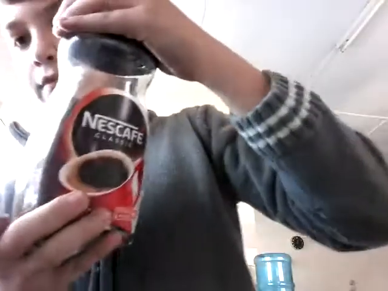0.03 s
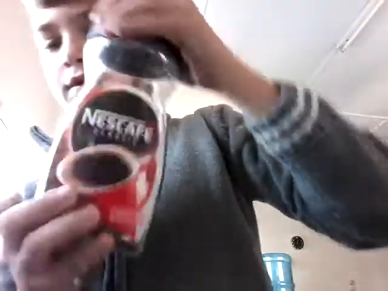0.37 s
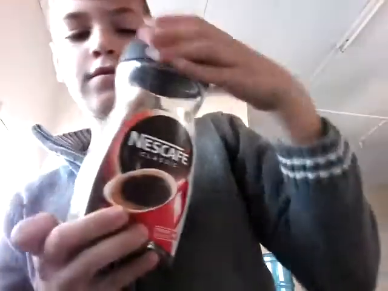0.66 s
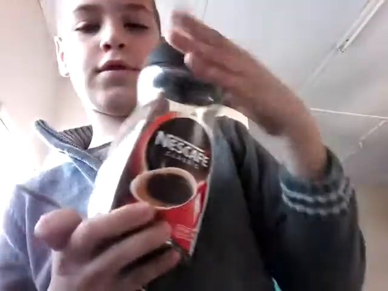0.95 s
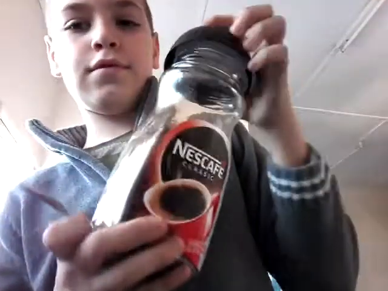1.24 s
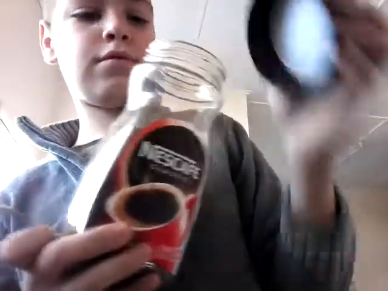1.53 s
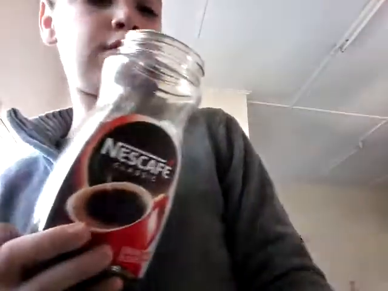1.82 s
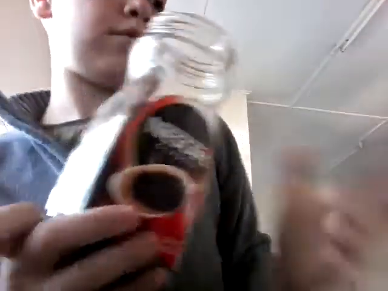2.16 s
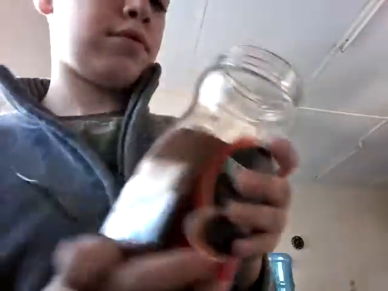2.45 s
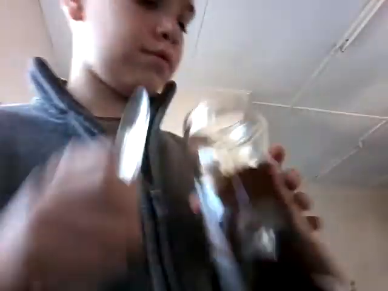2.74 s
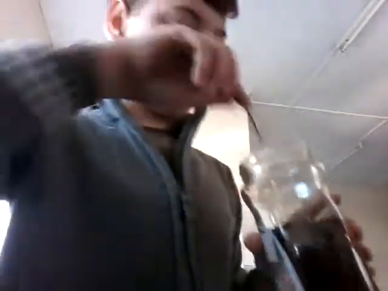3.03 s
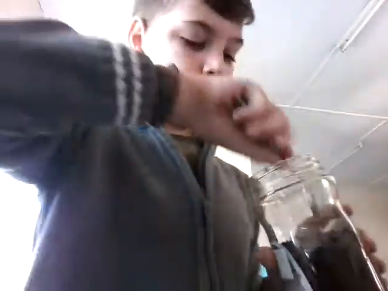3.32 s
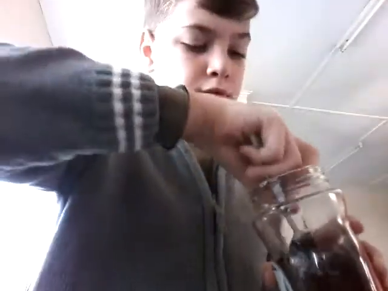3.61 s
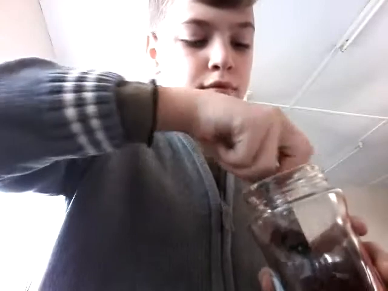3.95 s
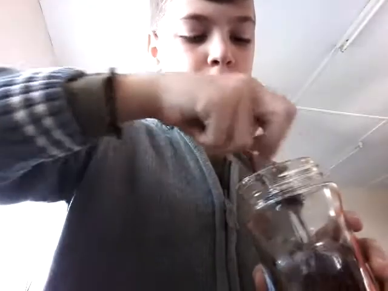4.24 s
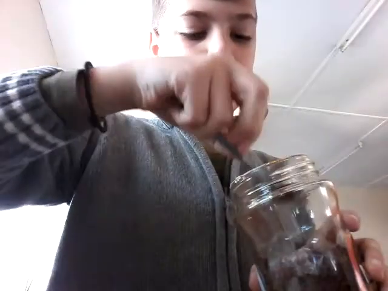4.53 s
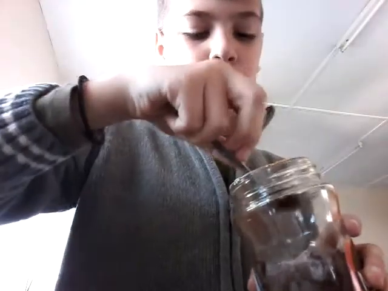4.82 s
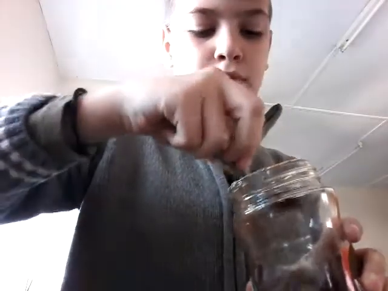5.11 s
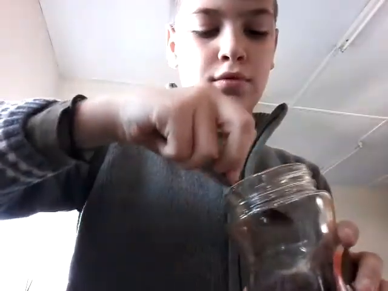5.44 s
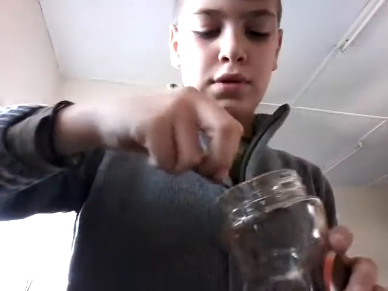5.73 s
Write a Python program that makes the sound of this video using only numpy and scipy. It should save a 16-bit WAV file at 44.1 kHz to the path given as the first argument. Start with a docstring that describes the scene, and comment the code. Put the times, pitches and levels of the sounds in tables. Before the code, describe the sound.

Close to the microphone in a kitchen, a plastic lid rubs and clicks along the thread of a glass coffee jar, then snaps free. It is put down on a table with a loud, hollow clack. After a pause, a metal teaspoon clinks brightly against the glass, taps it again more softly and ticks lightly as it digs. A faint hum and hiss run underneath.

```python
"""Opening a coffee jar

In a humming kitchen, close to the microphone, the plastic lid of a glass jar rubs along its thread,
snaps free and is put down on the table, where its cup rings. A teaspoon goes into the jar, clinks
against the glass, taps it again and ticks lightly as it digs in the coffee. Each blow excites damped
modes; the hand damps the jar, so most of the ring that follows is the reverberation of the room."""
import sys
import numpy as np
from scipy import signal
from scipy.fft import rfft, irfft, next_fast_len
from scipy.io import wavfile

SR = 44100
rng = np.random.default_rng(int(sys.argv[2]) if len(sys.argv) > 2 else 0)


def store_pcm(level_fs):
    """Save levels as 16-bit WAV."""
    pcm = np.round(np.clip(level_fs, -1, 1) * 32767).astype(np.int16)
    wavfile.write(sys.argv[1], SR, np.atleast_2d(pcm).T)


N = 258887
TIME = np.arange(N) / SR  # seconds into the scene
T = np.arange(SR // 2) / SR  # seconds since a blow

# Slow swings of the background. Each row: time in seconds, level in dB.
BACKGROUND_LEVEL = [(0.0, -52.5), (0.1, -54), (1.32, -52), (1.77, -54), (2.01, -50.5), (2.35, -55.5),
                    (3.81, -52), (4.23, -53.5), (5.13, -56), (5.33, -55), (5.87, -54.5)]
# Modes of the jar wall. Each row: frequency in Hz, relative level in dB, T60 in seconds.
GLASS_MODES = [(3780, -6.5, 0.054), (4088, -3, 0.086), (7100, -2.5, 0.048), (9200, -9, 0.089),
               (12100, -27, .05)]
# Spectrum of steel scratching glass. Each row: frequency in Hz, relative level in dB.
SCRATCH_SPECTRUM = [(1200, -57), (2000, -2), (2600, -8.5), (3400, -10.5), (4300, 0), (5500, 4.5),
                    (6200, 3.5), (7200, 6), (9500, -15), (16000, -15)]


def amp(db):
    """Amplitude ratio for a level in decibels."""
    return 10 ** (np.asarray(db) / 20)


def unit(x):
    """Normalisation to an rms of 1."""
    return x / np.sqrt(np.mean(x ** 2) + 1e-20)


def along(points, hz):
    """Interpolation of (Hz, value) points on a logarithmic frequency axis."""
    freqs, values = np.transpose(points)
    return np.interp(np.log(hz + 1), np.log(freqs), values)


def filtered(x, response):
    """Linear filtering: the spectrum of x is multiplied by a frequency response."""
    size = x.shape[-1]
    padded = next_fast_len(size + 4096)
    return irfft(rfft(x, padded) * response(np.fft.rfftfreq(padded, 1 / SR)), padded)[..., :size]


def noise(spectrum):
    """Spectral shaping of white noise, at rms 1."""
    return unit(filtered(rng.standard_normal(N), lambda hz: amp(along(spectrum, hz))))


def band(hz, width_hz):
    """Band-pass noise of rms 1: a narrow band beats like a wavering tone, a broad one hisses."""
    return unit(filtered(rng.standard_normal(N), lambda f: 1 / (1 + ((f - hz) / width_hz * 2) ** 2)))


def causal(x, spectrum):
    """Minimum-phase filtering: a body answers only after it is struck."""
    size = len(x)
    gain = amp(along(spectrum, np.fft.rfftfreq(size, 1 / SR)))
    cepstrum = irfft(np.log(gain), size)
    cepstrum[1:size // 2] *= 2
    cepstrum[size // 2:] = 0
    return irfft(rfft(x) * np.exp(rfft(cepstrum)), size)


def burst(spectrum, t60):
    """A contact transient: noise that falls 60 dB in t60 seconds, with the energy of its envelope."""
    fade = amp(-60 * T / t60)
    crack = causal(rng.choice([-1, 1], len(T)) * fade, spectrum)
    return unit(crack) * np.sqrt(np.mean(fade ** 2))


def ring(modes, attack_s, free=1, tilt_db=0):
    """Sum of damped modes: a grip scales T60 by free; hard contact tilts them up (dB per octave)."""
    hz, db, t60 = np.transpose(modes)[:, :, None]
    sign = (-1) ** np.arange(len(modes))[:, None]  # neighbouring modes start in opposite directions
    fade = amp(db + tilt_db * np.log2(hz / hz[0]) - 60 * T / (t60 * free))
    return (sign * fade * np.sin(2 * np.pi * hz * T)).sum(0) * (1 - np.exp(-T / attack_s))


def swell(s, rise_s, fall_s):
    """An exponential envelope that climbs 20 dB in rise_s to 1 at time s and drops 20 dB in fall_s."""
    since = TIME - s
    return amp(-20 * np.maximum(-since / rise_s, since / fall_s))


def in_room(x, wet_db, build_s=0.0013, dull_hz=10000):
    """Reverberation: reflections from the walls build a diffuse tail that has lost its top."""
    # Decay of the kitchen. Each row: frequency in Hz, T60 in seconds.
    reverb_times = [(200, 0.61), (1000, 0.54), (2200, 0.44), (4600, 0.38), (6700, 0.34), (8500, 0.28),
                    (14000, 0.39)]
    hz, t, bins = signal.stft(rng.standard_normal(len(T)), SR, nperseg=256)
    fade = amp(-60 * t / along(reverb_times, hz)[:, None])
    dull = 1 / np.sqrt(1 + (hz[:, None] / dull_hz) ** 6)
    tail = signal.istft(bins * fade * dull, SR, nperseg=256)[1][:len(T)]
    tail *= 1 - np.exp(-T / build_s)
    wet = signal.fftconvolve(x, tail)[:len(x)]
    return x + amp(wet_db) * unit(wet) * np.sqrt(np.mean(x ** 2))


def add(track, s, sound):
    """Superposition of a sound on the track, starting at s seconds."""
    part = track[round(s * SR):][:len(sound)]
    part += sound[:len(part)]


def hum_and_hiss_bands():
    """Band-pass noise: low wavering hum tones, with two broader bands of faint hiss above."""
    # Each row: centre frequency in Hz, bandwidth in Hz, level in dB.
    noise_bands = [(212.4, 10, -72), (324, 7.5, -64), (457.8, 28.3, -59), (998, 13, -75), (1590, 120, -69),
                   (3980, 750, -67)]
    return sum(amp(db) * band(hz, width_hz) for hz, width_hz, db in noise_bands)


def drone(mains_hz=100.6):
    """Low broadband noise and mains hum share one slow amplitude modulation."""
    # Each row: frequency in Hz, relative level in dB.
    drone_spectrum = [(20, -12), (50, -3.5), (80, -2.5), (150, -3), (300, -0.5), (400, 0), (490, 0),
                      (590, -15), (1200, -35)]
    level_db = np.interp(TIME, *np.transpose(BACKGROUND_LEVEL))
    rumble = amp(-1.5) * noise(drone_spectrum)
    mains = amp(-8.5) * band(mains_hz, width_hz=13.4)
    return amp(level_db) * (rumble + mains)


def microphone_hiss(mean_db=-52.5, swing_share=0.78):
    """Broadband noise of the microphone, modulated by a share of the drone's swings in level."""
    # Each row: frequency in Hz, relative level in dB.
    hiss_spectrum = [(200, -27), (700, -7), (1300, -8), (2200, -8.5), (3200, -10.5), (5200, -11),
                     (5800, -6), (6400, -0.5), (7200, 0), (8300, -9.5), (9300, -13.5), (11000, -24),
                     (15500, -32.5)]
    level_db = np.interp(TIME, *np.transpose(BACKGROUND_LEVEL))
    return amp(mean_db + swing_share * (level_db - level_db.mean())) * noise(hiss_spectrum)


def lid_clicks():
    """Impulsive excitation: plastic jumps the thread with a snap, a hollow knock and a soft thud."""
    # Clicks of the lid and of fingers on the jar. Each row: start in seconds, levels of snap,
    # hollow lid and thud in dB, tilt of the snap in dB per octave (a sharp snap is brighter).
    clicks = [(.1063, -43, -54, -47, -4), (0.2825, -25.5, -44, -54, 2), (.3145, -27, -31, -48, -4),
              (.3497, -28, -30.5, -62, -6), (0.6141, -31.5, -35.5, -40.5, -11),
              (.769, -43, -48, -37.5, -11), (1.153, -15, -52, -35, 8.5), (1.1657, -14.5, -39, -38, 3.5),
              (1.2288, -32, -47, -62, -7), (1.3048, -35.5, -45.5, -46, -7), (2.3544, -43, -49, -55, 0)]
    # Spectra of the plastic, the hollow lid and the hands.
    # Each row: frequency in Hz, relative level in dB.
    snap_spectrum = [(1500, -39), (3000, -32), (3900, -5.5), (5500, -0.5), (7200, 5), (8800, 2),
                     (10500, -12), (12000, -21), (16000, -21)]
    hollow_spectrum = [(400, -45), (900, 3), (1400, -12), (2000, 0.5), (2800, -6.5), (4200, 3.5),
                       (6000, -0.5), (10000, -41)]
    thud_spectrum = [(100, -28), (250, 6.5), (450, 8.5), (900, -24), (3000, -47)]
    out = np.zeros(N)
    for s, snap_db, hollow_db, thud_db, tilt_db in clicks:
        tilted = [(hz, db + tilt_db * np.log2(hz)) for hz, db in snap_spectrum]
        snap = amp(snap_db) * burst(tilted, t60=0.018)
        hollow = amp(hollow_db) * burst(hollow_spectrum, t60=0.029)
        thud = amp(thud_db) * burst(thud_spectrum, t60=0.052)
        add(out, s, in_room(snap + hollow + thud, wet_db=-11.5))
    return out


def lid_twist(slips_per_s=2500):
    """Stick-slip friction: plastic rubs in uneven little slips, which also ring the gripped glass."""
    # Pushes along the thread. Each row: time of greatest speed in seconds, run-out in seconds,
    # rub level in dB, glass level in dB.
    pushes = [(.324, 0.026, -38.5, -60), (.347, 0.022, -38, -50), (.376, 0.033, -39.5, -39.5),
              (.435, .14, -50, -66), (.77, .06, -47.5, -50), (1.16, 0.039, -35, -39)]
    # Sliding plastic. Each row: frequency in Hz, relative level in dB.
    rub_spectrum = [(300, -14), (1000, -5.5), (2000, -3.5), (3200, -12), (4000, 0), (5000, -6.5), (7200, 6),
                    (9000, -9), (14000, -26)]
    rub_gain = glass_gain = 0
    for s, run_out_s, rub_db, glass_db in pushes:
        speed = swell(s, rise_s=0.91 * run_out_s, fall_s=run_out_s)
        rub_gain += amp(rub_db) * speed
        glass_gain += amp(glass_db) * speed
    slips = (rng.random(N) < slips_per_s / SR) * rng.standard_normal(N)
    rub = unit(filtered(slips, lambda hz: amp(along(rub_spectrum, hz))))
    jar_response = ring(GLASS_MODES, attack_s=0.00027, free=0.25, tilt_db=-19)
    glass = unit(signal.fftconvolve(slips, jar_response)[:N])
    return in_room(rub_gain * rub + glass_gain * glass, wet_db=-10.5)


def low_tones(fade_s=0.14):
    """Faint low tones come and go: narrow-band noise under a trapezoidal envelope."""
    # Each row: start in seconds, end in seconds, frequency in Hz, level in dB.
    tones = [(.92, 1.85, 250.4, -58), (3.5, 4.048, 210, -61), (5.3, 5.75, 209, -61)]
    out = np.zeros(N)
    for start, end, hz, db in tones:
        gate = np.interp(TIME, [start, start + fade_s, end - fade_s, end], [0, 1, 1, 0])
        out += amp(db) * gate * band(hz, width_hz=4.8)
    return out


def lid_landing():
    """Impact excites the modes of lid and table: the rim hits first, then the lid drops flat."""
    # Each row: start in seconds, gains of lid ring, crack and table thud in dB.
    landings = [(1.8782, 0.5, -11.5, -40), (1.9349, -34, -47, -30)]
    # Modes of the lid's cup and the table top.
    # Each row: frequency in Hz, relative level in dB, T60 in seconds.
    lid_modes = [(738, -22, 0.071), (890, -35, 0.071), (982, -23, 0.065), (1123, -18, 0.086),
                 (1182, -11, 0.046), (1440, -31, 0.055), (1877, -23, 0.047), (2040, -25, 0.023),
                 (2920, -10.5, 0.01), (3440, -20, 0.018), (3750, -21, 0.01), (6500, -33, 0.012),
                 (7200, -30, 0.011)]
    table_modes = [(293, -7.5, 0.16), (463, -6.5, 0.08), (530, 1, 0.024), (790, 10, 0.0065),
                   (1090, 16, 0.015)]
    # Plastic meeting the table. Each row: frequency in Hz, relative level in dB.
    crack_spectrum = [(200, -20), (750, -2.5), (1500, -4.5), (2000, -0.5), (2400, -9), (3000, 0),
                      (3900, -3.5), (4900, -8), (5800, -16), (7000, 2), (8500, -22), (15000, -54)]
    out = np.zeros(N)
    for s, ring_db, crack_db, thud_db in landings:
        cup = amp(ring_db) * ring(lid_modes, attack_s=0.0013)
        table = amp(thud_db) * ring(table_modes, attack_s=0.0012)
        add(out, s, in_room(cup + table, wet_db=-9))
        crack = amp(crack_db) * burst(crack_spectrum, t60=0.014)
        add(out, s, in_room(crack, wet_db=-10))
    return out


def falling_note(start_hz=760, end_hz=440, glide_s=0.0253):
    """An exponential glide: as the lid comes to rest, a faint note sinks to a steady pitch."""
    # Brief swells of the note. Each row: time of the peak in seconds, level in dB.
    swells = [(2.04, -42.5), (2.066, -49), (2.125, -42.5)]
    since = np.maximum(TIME - swells[0][0], 0)
    pitch_hz = end_hz + (start_hz - end_hz) * np.exp(-since / glide_s)
    gain = sum(amp(db) * swell(s, rise_s=0.015, fall_s=0.025) for s, db in swells)
    return gain * np.sin(2 * np.pi * np.cumsum(pitch_hz) / SR)


def spoon_ticks():
    """Light touches of the digging spoon scratch the jar and set its wall in free vibration."""
    # Each row: start in seconds, ring gain in dB, scratch level in dB, ring tilt in dB per octave.
    ticks = [(3.479, -53.5, -56, 11.5), (3.556, -50.5, -60, 8), (4.5132, -51, -60, -6),
             (4.817, -42.5, -49, 2.5), (5.5097, -45, -42, 0), (5.677, -40, -36.5, -6)]
    out = np.zeros(N)
    for s, ring_db, scratch_db, tilt_db in ticks:
        glass = amp(ring_db) * ring(GLASS_MODES, attack_s=0.00093, tilt_db=tilt_db)
        scratch = amp(scratch_db) * burst(SCRATCH_SPECTRUM, t60=0.014)
        add(out, s, in_room(glass + scratch, wet_db=-17))
    return out


def spoon_clinks():
    """The spoon strikes the jar and rings in its own modes; coffee cushions the blow as a low-pass."""
    # Each row: start in seconds, ring gain in dB, scratch gain in dB, share of the free ring time
    # from 0 to 1, contact cut-off in Hz, reverberation relative to the ring in dB.
    clinks = [(3.7762, 0.5, -17, 0.86, 16000, -6), (4.1672, -7, -24, 0.29, 4180, -12)]
    # Modes of the steel spoon. Each row: frequency in Hz, relative level in dB, T60 in seconds.
    spoon_modes = [(2050, -22.5, 0.047), (4470, -24.5, 0.054), (4640, -27.5, 0.075), (4785, -29, 0.075),
                   (5900, -22, .03), (6250, -26, 0.049), (6265, -22, 0.057), (6510, -23.5, 0.057),
                   (6830, -15, 0.05), (6860, -27, 0.051), (7440, -20, 0.039), (7510, -26, .05),
                   (7600, -24, .04), (8200, -27, .028), (8330, -26.5, 0.049), (8640, -31, 0.037),
                   (9200, -30.5, 0.084), (9400, -39, 0.027), (10400, -35, 0.067), (11050, -27.5, .022),
                   (11900, -38, .03), (13200, -33, .04), (15000, -29, 0.022)]
    # The high-pass keeps the clink thin and bright, with no low knock.
    no_bass = signal.butter(4, 1500, "high", fs=SR, output="sos")
    out = np.zeros(N)
    for s, ring_db, scratch_db, free, contact_hz, room_db in clinks:
        steel = amp(ring_db) * ring(spoon_modes, attack_s=0.00047, free=free)
        steel = in_room(steel, wet_db=room_db)
        scratch = amp(scratch_db) * burst(SCRATCH_SPECTRUM, t60=0.051 * free)
        scratch = in_room(scratch, wet_db=-10.5)
        cushion = signal.butter(2, contact_hz, fs=SR, output="sos")
        add(out, s, signal.sosfilt(np.vstack([no_bass, cushion]), steel + scratch))
    return out


def scene():
    """All sources superpose at one microphone, which feeds both channels."""
    lid = lid_clicks() + lid_twist() + lid_landing() + falling_note()
    spoon = spoon_clinks() + spoon_ticks()
    background = hum_and_hiss_bands() + low_tones() + drone() + microphone_hiss()
    mono = lid + spoon + background
    return np.array([mono, mono])


def record(dry, top_hz=15800):
    """Each channel adds a trace of uncorrelated self-noise; nothing passes above the band limit."""
    # Each row: frequency in Hz, relative level in dB.
    self_noise_spectrum = [(30, -7), (150, -7), (700, 0.5), (1500, -3.5), (5000, -4.5), (9000, -2.5),
                           (15500, 3), (17000, -40)]
    self_noise = np.array([noise(self_noise_spectrum) for channel in range(2)])
    return filtered(dry + amp(-66) * self_noise, lambda hz: hz < top_hz)


dry = scene()
out = record(dry)
store_pcm(out)
```